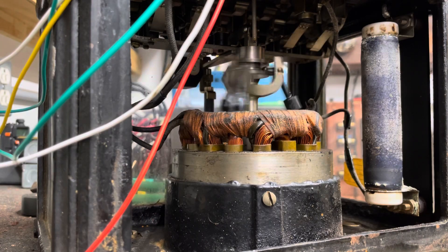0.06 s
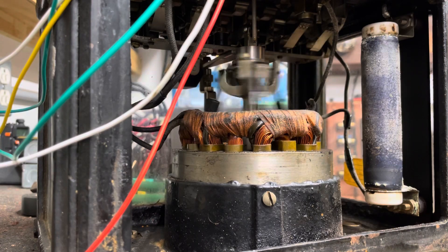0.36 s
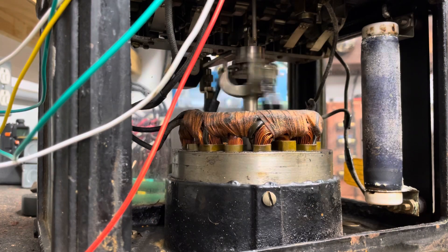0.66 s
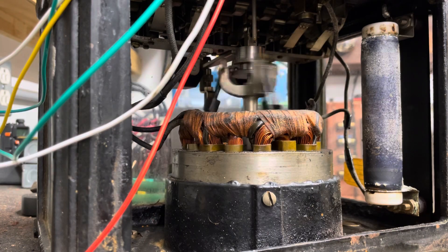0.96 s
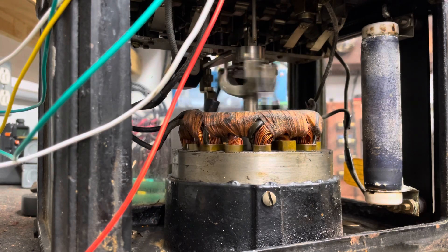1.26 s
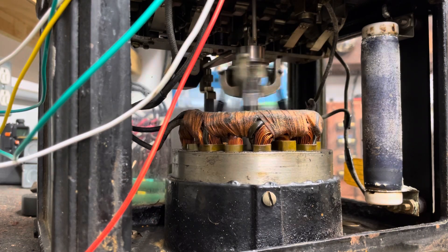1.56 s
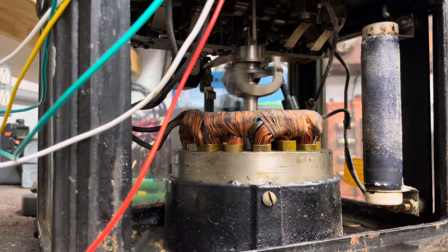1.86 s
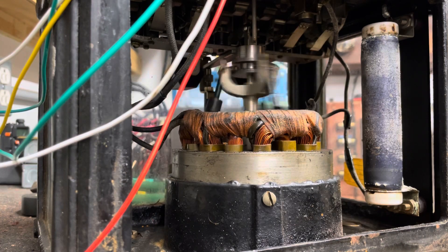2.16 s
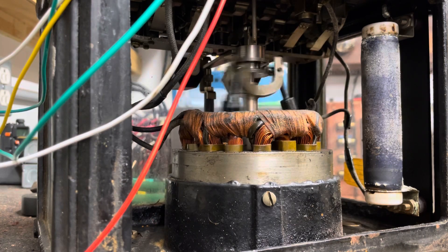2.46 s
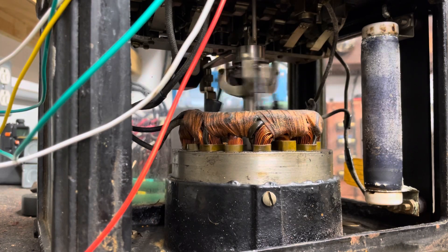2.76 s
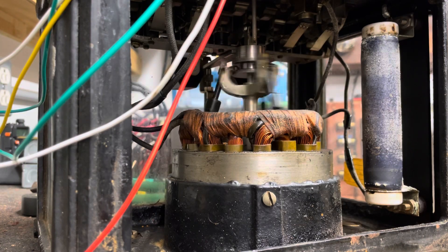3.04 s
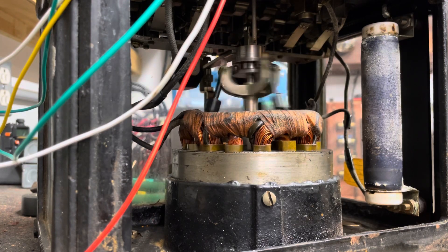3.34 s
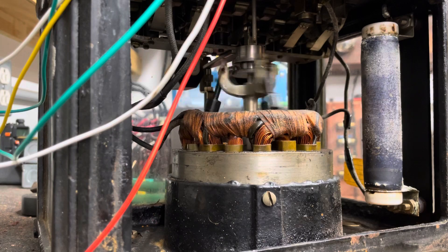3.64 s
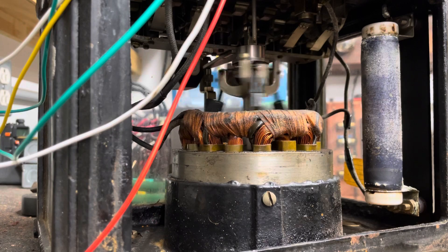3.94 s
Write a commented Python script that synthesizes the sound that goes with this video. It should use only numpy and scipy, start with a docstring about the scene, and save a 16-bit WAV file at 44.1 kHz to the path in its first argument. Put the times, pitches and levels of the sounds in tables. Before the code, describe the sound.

Rapid, regular metallic clatter comes from a rotating relay near the microphone, its contact snapping shut and dropping back as the metal cabinet resonates. It hits harder partway through and slows gradually, while a faint low hum and rumble continue.

```python
"""A spinning electromechanical relay, close by in its metal cabinet, slowly loses speed.
From the start the rotor rumbles and the coil hums faintly. On every cycle a contact snaps shut with a
bright tick and a clack, and its arm knocks on a bracket. About 15-20 ms later the arm drops back,
sets the cabinet booming and rebounds once. From about 1.5 seconds on the blows are mostly harder,
and by the end the cycles have slowed from about 15 a second to 9."""
import sys
import numpy as np
from scipy import signal
from scipy.fft import rfft, irfft, next_fast_len
from scipy.io import wavfile

SR = 44100
rng = np.random.default_rng(int(sys.argv[2]) if len(sys.argv) > 2 else 0)


def to_wav(s):
    """Save 16-bit WAV."""
    ch = np.atleast_2d(s).T  # columns
    pcm = np.round(np.clip(ch, -1, 1) * 32767)  # PCM
    wavfile.write(sys.argv[1], SR, pcm.astype(np.int16))


N = 176400
RING_T = np.arange(SR // 4) / SR   # the seconds over which one blow rings

# Tone of the rotor and the room air. Each row: pitch in Hz, relative level in dB.
RUMBLE_TONE = [(20, -10), (38, 1.5), (65, 3), (100, 6.5), (155, 3.5), (215, 14.5), (245, 9), (320, 17),
               (390, 7), (450, 0), (640, -6.5), (800, -6), (1400, -15.5), (4000, -25.5), (7000, -41),
               (12000, -34), (16000, -78)]
# The contact's cycles. Each row: closing time in seconds, its strength in dB, drop time in seconds,
# its strength in dB. A blow's "force" is how far its strength lies above these full strengths.
CONTACT_CYCLES = [(0.0004, -38, 0.0127, -48), (0.0568, -39, 0.0707, -38.5), (0.1253, -40, 0.1405, -41),
                  (0.1966, -40.5, 0.2095, -40), (0.2676, -41, 0.2808, -39.5), (0.337, -37.5, 0.3519, -42.5),
                  (0.4092, -40, 0.4226, -40.5), (0.482, -39, 0.4951, -40.5), (0.5523, -41, 0.5676, -40),
                  (0.6262, -37, 0.6402, -41), (0.7, -43, 0.7138, -39.5), (0.7729, -47.5, 0.7884, -41.5),
                  (0.8483, -38.5, 0.8618, -41), (0.9245, -41.5, 0.9379, -39.5),
                  (1.0004, -43.5, 1.0137, -41.5), (1.075, -45.5, 1.0889, -38.5), (1.1527, -39, 1.1666, -40),
                  (1.2271, -36.5, 1.2442, -41), (1.3028, -43.5, 1.3213, -41), (1.3846, -44, 1.4004, -39.5),
                  (1.4603, -30.5, 1.4787, -35.5), (1.5403, -34, 1.5575, -38), (1.622, -47, 1.6378, -39),
                  (1.6989, -33.5, 1.718, -35.5), (1.7811, -33.5, 1.7983, -40),
                  (1.8635, -33.5, 1.8812, -36.5), (1.943, -34, 1.9632, -34.5), (2.027, -34, 2.0455, -35.5),
                  (2.1111, -32, 2.1301, -36), (2.1953, -31.5, 2.2141, -34.5), (2.2808, -31.5, 2.2993, -36),
                  (2.3681, -35.5, 2.3869, -38), (2.4544, -31.5, 2.4744, -35), (2.5441, -33.5, 2.5628, -37),
                  (2.635, -32.5, 2.6537, -37.5), (2.7253, -32, 2.7443, -35.5), (2.8171, -31.5, 2.8363, -36),
                  (2.912, -36.5, 2.9308, -37.5), (3.0048, -34.5, 3.0251, -35), (3.101, -37.5, 3.1209, -38),
                  (3.199, -33.5, 3.2192, -38), (3.2971, -31.5, 3.3179, -35), (3.3983, -31.5, 3.4182, -37),
                  (3.5017, -32.5, 3.5211, -37), (3.6035, -36.5, 3.6246, -35.5), (3.71, -33.5, 3.73, -36.5),
                  (3.8172, -38.5, 3.8375, -38), (3.9246, -36.5, 3.9463, -35)]
FULL_CLOSE_DB, FULL_DROP_DB = -33, -37.5
# Tones of the tips' ticks and the small parts' clack. Each row: pitch in Hz, relative level in dB.
CLOSE_TICK_TONE = [(6500, -24), (7900, -9.5), (8700, -3), (10500, -3), (12000, 2), (13800, 0), (14700, -15),
                   (15600, -32), (16500, -41)]
DROP_TICK_TONE = [(6500, -23.5), (7900, -39), (8700, 4), (10300, 6.5), (12000, 3), (13500, -0.5),
                  (14800, -18), (15600, -26), (16500, -48)]
CLACK_TONE = [(550, 0), (850, 4), (1400, 0), (2500, -3), (3200, -1.5), (3800, 7.5), (4600, -5), (5100, 0),
              (5600, -4), (6200, 3.5), (7200, -16), (9000, -61)]
# The clearest pitches of the contact tips, and their level.
TIP_HZ, TIP_DB = [10700, 11000, 12900, 12930, 14900], -45.5
# Notes of the arm and its bracket. Each row: pitch in Hz, closing level in dB, drop level in dB,
# seconds to fade by 60 dB, left over right in dB.
ARM_NOTES = [(500, -54.5, -58, 0.11, 14), (584.4, -55.5, -62.5, 0.17, 17.5), (644.5, -47.5, -56, 0.11, 18),
             (1300, -46, -49.5, 0.072, 5), (1380, -50.5, -42.5, 0.029, 12.5),
             (1509, -55.5, -46.5, 0.03, 20), (1920, -50, -46.5, 0.074, -2), (2025, -52.5, -49.5, 0.05, 6.5),
             (2094, -49, -51, 0.045, 2), (2868, -50, -57.5, 0.04, -0.5), (3688, -45.5, -53.5, 0.031, 12.5),
             (4160, -44.5, -43, 0.031, 3.5)]
# Extra hard knocks. Each row: start in seconds, level in dB.
EXTRA_KNOCKS = [(1.463, -42), (2.459, -36), (3.0072, -33.5), (3.927, -37)]
# Notes of the cabinet. Each row: pitch in Hz, base level in dB, seconds to the peak.
CABINET_NOTES = [(62, -66, 0.03), (214.4, -47.5, 0.015), (285.8, -47, 0.016), (325, -52.5, 0.033),
                 (351.7, -48, 0.014)]
# How the boom's strength wanders. Each row: time in seconds, boost in dB.
BOOM_BOOST = [(0, 2), (.55, -.5), (1.1, -3), (1.33, 3), (1.7, -1.5), (2.1, 0), (2.9, -2), (4, -1)]
# The rebound, later and weaker once the rotor slows. Each row: time in seconds,
# delay after the drop in seconds, strength against the drop in dB.
REBOUNDS = [(0, 0.0064, -2), (1.15, 0.0073, -4), (1.3, .0075, -15.5), (1.8, 0.0099, -12), (2.3, .0108, -8),
            (4, 0.011, -10)]
# How alike the noise is on the left and right. Each row: pitch in Hz, likeness from 0 to 1.
STEREO_LIKENESS = [(60, 0.76), (270, 0.8), (700, 0.18), (2000, 0.39), (3500, 0.48), (6500, 0.79),
                   (9000, 0.99), (15000, 0.97)]
# Balance of the two microphones. Each row: pitch in Hz, left over right in dB.
MIC_BALANCE = [(60, 2.5), (140, 4), (240, .5), (340, 1), (420, 5), (750, 3), (1400, 3), (2000, 1),
               (3500, 2), (5500, 1.5), (8500, 0)]
# Timing of the two microphones. Each row: pitch in Hz, the left one's lead in radians.
MIC_PHASE = [(100, 0), (2900, 0), (3300, -4), (4000, -5.4), (5200, -5.3), (5900, -7.3), (6900, -7.3),
             (7700, -9.2), (8600, -9.4), (11000, -11), (13500, -12.5), (16000, -12.6)]


def from_db(db):
    """Turns decibels into a volume factor."""
    return 10 ** (np.asarray(db) / 20)


def at_hz(table, hz):
    """Reads a table between its rows, giving every octave equal room."""
    pitches, values = np.transpose(table)
    return np.interp(np.log(np.maximum(hz, 1)), np.log(pitches), values)


def fade(fade_s):
    """A ring dies away, losing 60 dB in fade_s seconds."""
    return from_db(-60 * RING_T / fade_s)


def place(times, sounds):
    """Adds each sound to a stereo track at its start time."""
    track = np.zeros((2, N + SR))
    for start, sound in zip(times, sounds):
        i = int(max(start, 0) * SR)
        track[:, i:i + sound.shape[-1]] += sound
    return track[:, :N]


def shaped_noise(white, tone, shift=1):
    """Turns pairs of white noises into left and right with the given tone, at an overall level of 1."""
    size = white.shape[-1]
    hz = np.fft.rfftfreq(size, 1 / SR)
    spectra = rfft(white) * from_db(at_hz(tone, hz / shift))
    alike = at_hz(STEREO_LIKENESS, hz)
    shared = np.sqrt(1 + alike) * spectra[..., :1, :]
    opposite = np.sqrt(1 - alike) * spectra[..., 1:, :] * [[1], [-1]]
    noise = irfft(shared + opposite, size)
    return noise / np.sqrt(np.mean(noise ** 2))


def rotor_and_coil(rumble_db=-52, hum_db=-66.5, hum_hz=120.2):
    """The rotor rumbles steadily and mains power makes the coil hum."""
    rumble = shaped_noise(rng.standard_normal((2, N)), RUMBLE_TONE)
    hum = np.sqrt(2) * np.sin(2 * np.pi * hum_hz * np.arange(N) / SR)
    return from_db(rumble_db) * rumble + from_db(hum_db) * hum


def metal_rattle(times, db, tone, rise_s, fade_s, tail_db, tail_s, same_share, pitch_spread):
    """Struck metal rings at countless close pitches, dies quickly and leaves a faint tail in the room."""
    same = rng.standard_normal((2, len(RING_T)))
    fresh = rng.standard_normal((len(times), 2, len(RING_T)))
    white = np.sqrt(same_share) * same + np.sqrt(1 - same_share) * fresh
    # Each blow's pitch shifts by chance, and upward when it is harder.
    shift = np.exp(pitch_spread * (rng.standard_normal(len(times)) + 0.18 * (db - db.mean())))
    ring = shaped_noise(white, tone, shift[:, None, None])
    # Each blow is a run of tiny, uneven touches, 0.7 ms apart.
    touches_db = 2.2 * rng.standard_normal((len(times), 400))
    grit = from_db([np.interp(RING_T / 0.0007, np.arange(len(row)), row) for row in touches_db])
    rise = 1 - np.exp(-RING_T / rise_s)
    loudness = rise * np.hypot(grit * fade(fade_s), from_db(tail_db) * fade(tail_s))
    return place(times, ring * (loudness * from_db(db)[:, None])[:, None])


def closings(chatter_s=0.0026, chatter_db=-6):
    """The contact snaps shut and chatters once: its tips tick, small parts clack and the arm rings."""
    times, strength_db = np.transpose(CONTACT_CYCLES)[:2]
    force = strength_db - FULL_CLOSE_DB
    tick_db = -27.5 + np.r_[force, force + chatter_db]
    ticks = metal_rattle(np.r_[times, times + chatter_s], tick_db, CLOSE_TICK_TONE, rise_s=0.0003,
                         fade_s=0.018, tail_db=-21.5, tail_s=0.074, same_share=0.5, pitch_spread=0.043)
    clacks = metal_rattle(times, -40.5 + 0.5 * force, CLACK_TONE, rise_s=0.00088,
                          fade_s=0.037, tail_db=-26.5, tail_s=0.41, same_share=0.94, pitch_spread=0.0047)
    return ticks + clacks + tip_ring(times, force) + arm_ring(times, force, closing=True)


def tip_ring(times, force):
    """The contact tips ring faintly at a few high pitches, in a new mix on every closing."""
    loudness = from_db(TIP_DB + force)[:, None] * fade(0.028)
    rings = 0
    for hz in TIP_HZ:
        mix = rng.standard_normal((len(times), 2))
        phase = 2 * np.pi * hz * RING_T
        rings += loudness * (mix[:, :1] * np.sin(phase) + mix[:, 1:] * np.cos(phase))
    return place(times, rings[:, None])


def arm_ring(times, force, closing):
    """Each blow rings the arm's notes. High ones follow the force more, so hard blows sound brighter."""
    track = 0
    for hz, close_db, drop_db, fade_s, left_db in ARM_NOTES:
        base_db, follows = (close_db, 0.5) if closing else (drop_db, 1)
        force_share = min(1, follows * (hz / 1800) ** 0.73)
        chance = rng.standard_normal((len(times), 2))
        db = base_db + force_share * force + 2.5 * chance[:, 0]
        pitch = hz * (1 + 0.0088 * chance[:, 1:])
        waves = np.sin(2 * np.pi * pitch * RING_T) * from_db(db)[:, None]
        rise = 1 - np.exp(-RING_T * hz / 8.8)   # swells over about 9 vibrations
        sides = from_db([[left_db / 2], [-left_db / 2]])
        track += place(times, (waves * rise * fade(fade_s))[:, None]) * sides
    return track


def knocks(hz=1365, lag_s=0.003014, rise_s=0.0019, loss_db_per_s=2.2):
    """After each closing the arm hits its bracket. The usual hollow knock weakens as the rotor slows."""
    closes = np.array(CONTACT_CYCLES)[:, 0]
    usual_db = -41 - loss_db_per_s * closes + 2.5 * rng.standard_normal(len(closes))
    hard_times, hard_db = np.transpose(EXTRA_KNOCKS)
    gain = from_db(np.r_[usual_db, hard_db])
    ring = np.sin(2 * np.pi * hz * RING_T) * (1 - np.exp(-RING_T / rise_s)) * fade(0.031)
    return place(np.r_[closes + lag_s, hard_times], gain[:, None, None] * ring)


def cabinet_boom(lag_s=0.0022, close_lag_s=0.00369, close_db=-9.5):
    """The cabinet's low notes swell and throb together: weakly after a closing, fully after a drop."""
    closes, _, drop_times, strength_db = np.transpose(CONTACT_CYCLES)
    drop_force = strength_db - FULL_DROP_DB + np.interp(drop_times, *np.transpose(BOOM_BOOST))
    times = np.r_[drop_times, closes + close_lag_s]
    force = np.r_[drop_force, drop_force + close_db]
    booms = 0
    for hz, base_db, peak_s in CABINET_NOTES:
        chance = rng.standard_normal((len(times), 2))
        gain = from_db(base_db + force - 0.2 * chance[:, 0])
        pitch = hz * (1 + 0.016 * chance[:, 1:])
        swell = (RING_T / peak_s * np.exp(1 - RING_T / peak_s)) ** 1.5
        booms += gain[:, None] * swell * np.cos(2 * np.pi * pitch * RING_T)
    return place(times + lag_s, booms[:, None])


def drops(graze_db=-9.5):
    """The arm drops back on its stop, grazes it lightly and rebounds once."""
    starts, strength_db = np.transpose(CONTACT_CYCLES)[2:]
    drop_force = strength_db - FULL_DROP_DB
    when, delays, change_db = np.transpose(REBOUNDS)
    delay_s = np.interp(starts, when, delays)
    chance = rng.standard_normal((len(starts), 2))
    rebound_times = starts + delay_s + 0.0008 * chance[:, 0]
    rebound_force = drop_force + np.interp(starts, when, change_db) + 2.2 * chance[:, 1]
    times, force = np.r_[starts, rebound_times], np.r_[drop_force, rebound_force]
    ticks = metal_rattle(times, -31.5 + force, DROP_TICK_TONE, rise_s=0.0003,
                         fade_s=0.022, tail_db=-37, tail_s=0.27, same_share=0.097, pitch_spread=0.033)
    graze_times = starts + delay_s * rng.uniform(0.46, 1, len(starts))
    clack_db = -39.5 + np.r_[force, drop_force + graze_db]
    clacks = metal_rattle(np.r_[times, graze_times], clack_db, CLACK_TONE, rise_s=0.0013,
                          fade_s=0.029, tail_db=-26.5, tail_s=0.19, same_share=0.27, pitch_spread=0.0085)
    return ticks + clacks + arm_ring(times, force, closing=False)


def scene():
    """The relay's blows sound over its steady rumble and hum."""
    return closings() + drops() + knocks() + cabinet_boom() + rotor_and_coil()


def record(dry, cutoff_hz=17100):
    """Two microphones hear the relay with their own level and timing; the highest treble is cut."""
    size = next_fast_len(N + SR // 10)
    hz = np.fft.rfftfreq(size, 1 / SR)
    sides = np.array([[0.5], [-0.5]])
    balance = from_db(sides * at_hz(MIC_BALANCE, hz))
    timing = np.exp(1j * sides * at_hz(MIC_PHASE, hz))
    heard = irfft(rfft(dry, size) * balance * timing, size)[:, :N]
    return signal.sosfilt(signal.cheby2(14, 60, cutoff_hz, fs=SR, output="sos"), heard)


dry = scene()
out = record(dry)
to_wav(out)
```